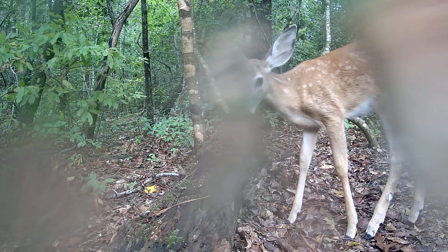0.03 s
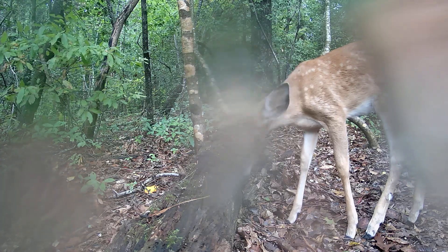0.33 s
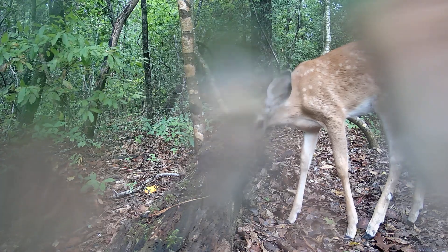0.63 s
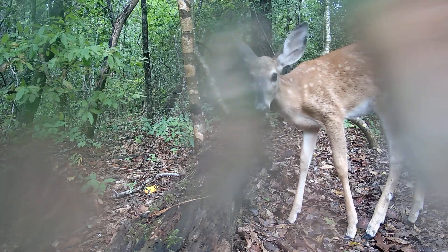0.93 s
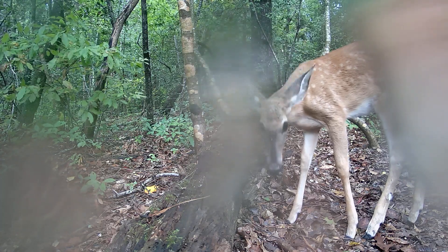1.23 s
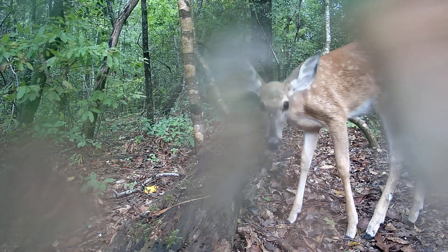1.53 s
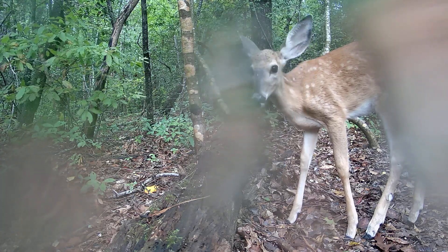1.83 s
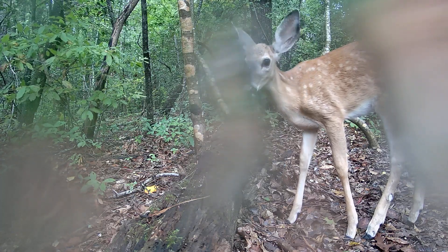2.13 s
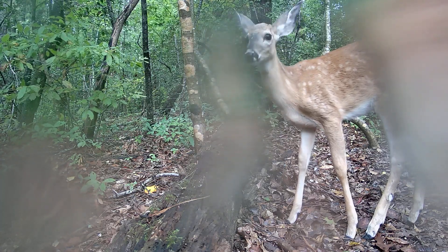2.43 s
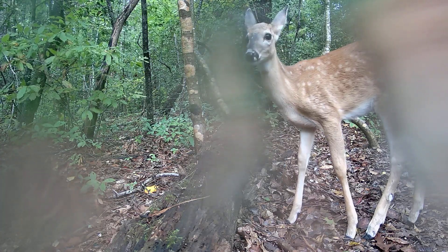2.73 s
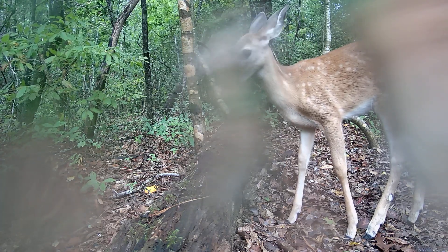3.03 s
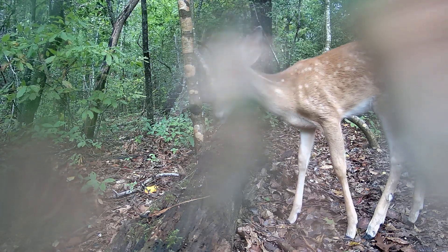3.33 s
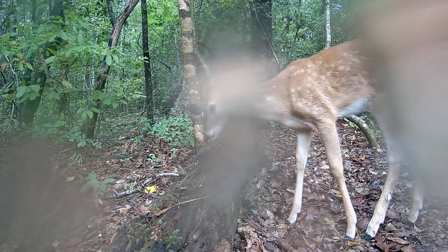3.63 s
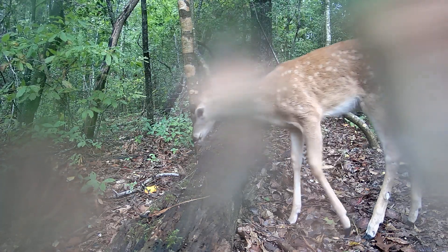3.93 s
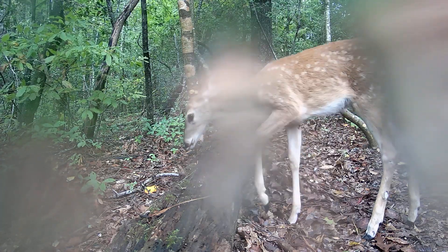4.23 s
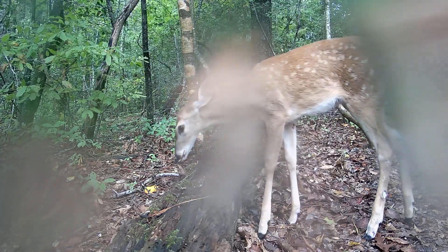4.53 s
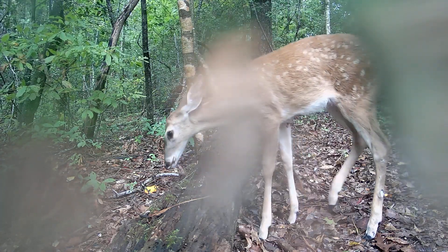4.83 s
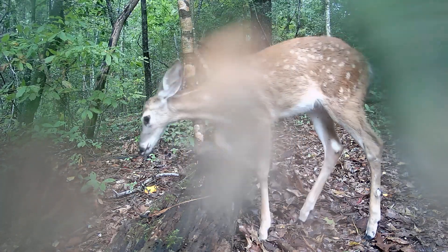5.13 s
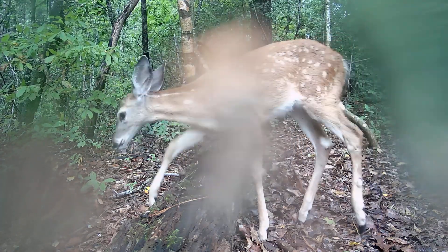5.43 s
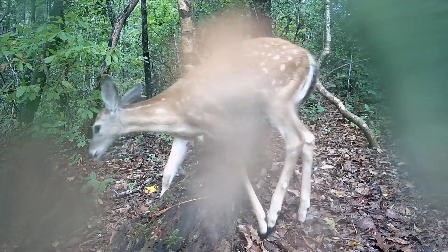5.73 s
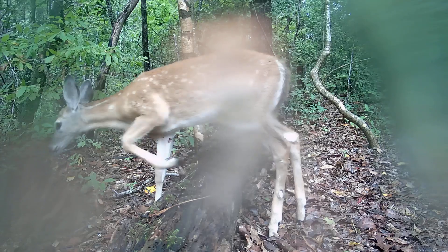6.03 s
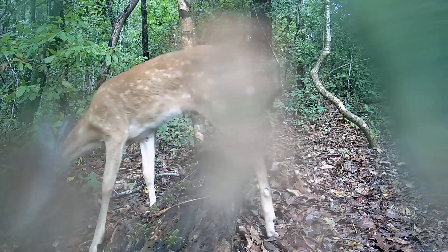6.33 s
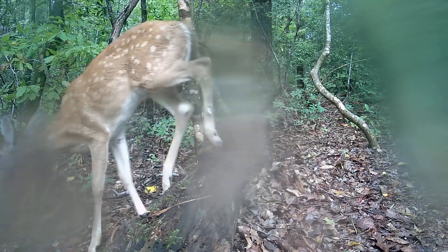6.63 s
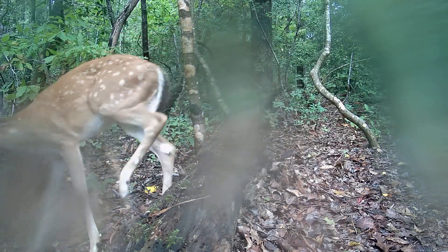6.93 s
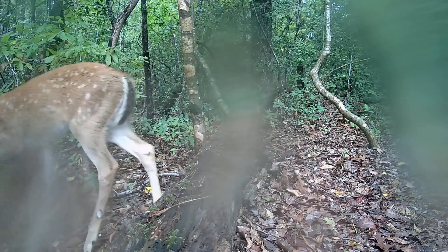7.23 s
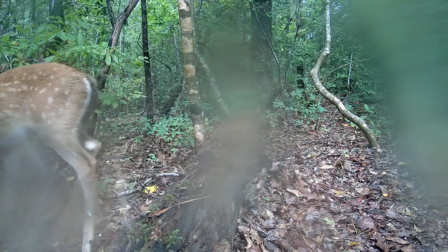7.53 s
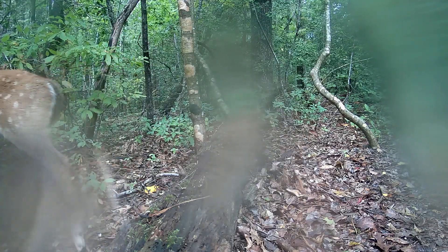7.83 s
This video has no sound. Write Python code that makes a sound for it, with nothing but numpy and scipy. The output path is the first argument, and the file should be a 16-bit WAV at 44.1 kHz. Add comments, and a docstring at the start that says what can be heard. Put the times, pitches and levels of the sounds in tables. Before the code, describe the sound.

Hollow wind noise and low rumble build over faint ticks of a fawn stepping through leaf litter, then two quick, soft knocks.

```python
"""Fawn passing a forest trail camera.

A rush and hiss of air over a low rumble slowly grows, crests and eases above steady microphone hiss,
all coloured by the camera's hollow case. Hooves stir the leaf litter in faint ticks and rustles.
Two dull bumps knock and swing the case as the fawn passes close."""
import sys
import numpy as np
from scipy import signal
from scipy.fft import rfft, irfft, next_fast_len
from scipy.io import wavfile
from scipy.ndimage import uniform_filter1d, map_coordinates

SR = 44100
rng = np.random.default_rng(int(sys.argv[2]) if len(sys.argv) > 2 else 0)


def materialize(psi):
    """Save the field psi as 16-bit PCM at rate SR to the path in sys.argv[1].

    A 1-D psi becomes a single channel; in a 2-D psi each row is a channel.
    """
    bounded = np.clip(np.atleast_2d(psi).T, -1, 1)
    quanta = np.round(bounded * 32767).astype(np.int16)
    wavfile.write(sys.argv[1], SR, quanta)


N = 352359


def amp(db):
    """dB to gain."""
    return 10 ** (np.asarray(db) / 20)


def unit(x):
    """Scale to rms 1."""
    return x / np.sqrt(np.mean(x ** 2) + 1e-20)


def along(points, hz):
    """Interpolate (f/Hz, value) points on a log frequency axis."""
    f, v = np.transpose(points)
    return np.interp(np.log(hz + 1), np.log(f + 1), v)


def wobble(rate_hz):
    """Smooth random curve, rate_hz knots per second."""
    return map_coordinates(rng.standard_normal(400), [np.arange(N) * rate_hz / SR], mode="wrap")


def filtered(x, response):
    """Zero-phase filter with gain response(hz)."""
    m = next_fast_len(len(x) + 8192)
    return irfft(rfft(x, m) * response(np.fft.rfftfreq(m, 1 / SR)), m)[:len(x)]


def band(x, centre_hz, width_oct):
    """Band-pass, Gaussian in log frequency."""
    return filtered(x, lambda hz: np.exp(-.5 * (np.log2((hz + 1) / centre_hz) / width_oct) ** 2))


def case_db(hz):
    """Air resonances in the hollow case lift a few broad bands."""
    # resonances: f/Hz, width/Hz, lift/dB
    modes = [(528, 223, 3.5), (1205, 280, 4), (1810, 480, 1.5)]
    return sum(lift / (1 + (2 * (hz - centre) / width) ** 2) for centre, width, lift in modes)


def case_noise(spectrum, grain_db, frame=1024):
    """Noise through the case, rms 1; random time-frequency patches of gain make it grainy."""
    bins = signal.stft(rng.standard_normal(N), nperseg=frame)[2]
    patches = uniform_filter1d(rng.standard_normal(bins.shape), size=4, axis=0)
    patches = uniform_filter1d(patches, size=3, axis=1)
    grainy = signal.istft(bins * amp(grain_db * unit(patches)), nperseg=frame)[1][:N]
    return unit(filtered(grainy, lambda hz: amp(along(spectrum, hz) + case_db(hz))))


def air_strength_db(t):
    """Air strength relative to its crest: a rounded climb, then a slow easing."""
    crest_s, climb_db, ease_db_per_s = 6.15, 9, 0.5
    to_climb = np.clip(1 - t / crest_s, 0, 1)
    return -climb_db * to_climb ** 2.2 - ease_db_per_s * np.maximum(t - crest_s, 0)


def swells_db(t):
    """Brief swells and dips in the level of the rush and of the rumble."""
    # swells and dips: centre t/s, length/s, rush lift/dB, rumble lift/dB
    swells = [(0.334, 0.22, 3.5, 3.5), (0.765, 0.046, 1.5, 0), (0.834, 0.044, 0, 6),
              (0.869, 0.029, 4.5, -2), (1.26, 0.1, 2.6, -1), (1.54, 0.066, -2, 2.5), (1.605, 0.04, 3.5, 3),
              (2.01, 0.096, 2.5, 0.5), (2.513, 0.094, 3, 0), (2.6, 0.029, -1.5, -4), (2.98, 0.054, 2.7, 2),
              (3.073, 0.04, -1, -1.5), (3.29, 0.038, 3, 4), (3.385, 0.035, 2.3, 0), (3.45, 0.05, -3, -1),
              (3.964, 0.11, -0.5, 3.5), (7.767, 0.13, 0.5, 6)]
    centre_s, length_s, rush_db, rumble_db = np.transpose(swells)
    shapes = np.exp(-2 * ((t - centre_s[:, None]) / length_s[:, None]) ** 2)
    return rush_db @ shapes, rumble_db @ shapes


def air():
    """Moving air: rumble, rush and hiss brighten as they grow; the rush settles from burble to flow."""
    # layer spectra: f/Hz, relative density/dB
    rumble_spectrum = [(10, -16.5), (25, -11.5), (42, -5), (62, 0), (125, -1.5), (170, -5.5), (250, -23),
                       (500, -59)]
    rush_spectrum = [(60, -29), (200, -1.5), (350, -2.5), (800, -1.5), (1100, -2), (1500, -7), (2000, -7),
                     (2400, -21), (4000, -26), (8000, -45.5)]
    hiss_spectrum = [(500, -19.5), (1500, -5.5), (2300, 1), (2900, 2), (3900, 0.5), (5000, -4.5),
                     (6200, -8), (7500, -10), (8000, -19), (8500, -26), (9000, -53.5)]
    crest_db, settle_s, settle_span_s = -27, 3.52, .3
    t = np.arange(N) / SR
    strength_db = air_strength_db(t)
    rush_swell_db, rumble_swell_db = swells_db(t)
    flutter = amp(.5 * wobble(rate_hz=50))
    burble_share = .5 - .5 * np.tanh((t - settle_s) / settle_span_s)
    burble = case_noise(rush_spectrum, grain_db=3.2, frame=768) * flutter
    flow = case_noise(rush_spectrum, grain_db=2.4, frame=768)
    rush = np.sqrt(burble_share) * burble + np.sqrt(1 - burble_share) * flow
    hiss = case_noise(hiss_spectrum, grain_db=2.8, frame=640) * flutter
    lumps = amp(-0.3 * wobble(rate_hz=31))
    rumble = case_noise(rumble_spectrum, grain_db=1.4) * lumps
    # higher layers grow faster with strength
    rumble *= amp(-4.5 + 0.71 * strength_db + rumble_swell_db)
    rush *= amp(0.01 + 1.165 * strength_db + rush_swell_db)
    hiss *= amp(-5 + 1.41 * strength_db)
    return amp(crest_db) * (rumble + rush + hiss)


def microphone_hiss():
    """The microphone's own even noise."""
    # noise floor: f/Hz, relative density/dB
    spectrum = [(200, 4), (1900, -1.5), (2400, -7), (5000, -3), (7500, -5), (8000, -14), (8500, -18.5),
                (9000, -48.5)]
    return amp(-43) * case_noise(spectrum, grain_db=1.5)


def leaf_litter():
    """Dry leaves tick and crackle under the hooves, fading above about 8 kHz, the microphone's limit."""
    # ticks and rustles: centre t/s, length/s, level/dB, f/Hz, width/oct
    rustles = [(0.792, 0.021, -37, 2550, 0.28), (0.965, 0.03, -50, 5800, .3),
               (1.489, 0.0093, -33, 2580, .2), (1.812, 0.022, -38, 3900, .15),
               (2.002, 0.066, -39.5, 5070, .4), (2.019, 0.01, -33, 2250, .2), (2.538, 0.2, -40, 4370, 0.49),
               (3.901, 0.31, -41.5, 5570, .4), (4.295, 0.01, -32, 4400, .25),
               (4.506, 0.059, -32.5, 3300, .13), (4.882, 0.35, -39, 5370, 0.43),
               (5.1, 0.17, -36, 3700, 0.49), (5.118, 0.012, -37, 5800, .3), (5.888, 0.18, -36, 2700, 0.35),
               (5.985, 0.032, -36, 5500, .4), (6.038, 0.012, -30, 4080, .25), (6.955, 0.026, -35, 5700, .3),
               (7.039, 0.018, -34, 5400, .25), (7.089, 0.013, -34, 6400, 0.23),
               (7.085, 0.031, -31, 2690, .35), (7.414, 0.012, -36, 4000, .25),
               (7.93, 0.067, -34.5, 4000, 0.43)]
    crackles_per_s = 2900
    out = np.zeros(N)
    t = np.arange(SR // 2) / SR - 1 / 4
    for centre_s, length_s, db, hz, width_oct in rustles:
        grains = rng.standard_normal(len(t)) * (rng.random(len(t)) < crackles_per_s / SR)
        crackle = unit(band(grains, hz, width_oct))
        swell = np.exp(-2 * (t / length_s) ** 2)
        add(out, centre_s + t[0], amp(db) * crackle * swell)
    mic_rolloff = [(7300, -2.5), (8000, -4.5), (9000, -28)]  # f/Hz, gain/dB
    return filtered(out, lambda hz: amp(along(mic_rolloff, hz)))


def add(track, start_s, sound):
    """Mix sound into track at start_s."""
    part = track[round(start_s * SR):][:len(sound)]
    part += sound[:len(part)]


def pulse(t, hz, rise_s):
    """Heavily damped vibration; the envelope peaks at rise_s."""
    return np.sin(2 * np.pi * hz * t) * (t / rise_s * np.exp(1 - t / rise_s)) ** 2


def bumps():
    """Each soft blow knocks the case, swings it a cycle or two and leaves a short low thud."""
    # blows: t/s, level/dB, swing f/Hz, rise/s, knock re swing/dB, thud level/dB
    blows = [(6.489, -9.5, 177, 0.0022, -8, -19), (6.6493, -11, 250, 0.0029, -6, -39)]
    thud_rise_s, thud_t60_s, contact_cutoff_hz = 0.0028, 0.22, 660
    out = np.zeros(N)
    t = np.arange(SR // 4) / SR
    thud_envelope = (1 - np.exp(-t / thud_rise_s)) * amp(-60 * t / thud_t60_s)
    for start_s, db, swing_hz, rise_s, knock_db, thud_db in blows:
        swing = pulse(t, swing_hz, rise_s)
        knock = pulse(t, hz=457, rise_s=.8 * rise_s)
        thud = unit(band(rng.standard_normal(len(t)), centre_hz=150, width_oct=0.63)) * thud_envelope
        add(out, start_s, amp(db) * (swing - amp(knock_db) * knock) + amp(thud_db) * thud)
    return filtered(out, lambda hz: 1 / np.sqrt(1 + (hz / contact_cutoff_hz) ** 10))


def scene():
    """Mono mix at the microphone."""
    return (air() + bumps() + leaf_litter() + microphone_hiss())[None]


def record(dry):
    """The camera: silent until its microphone switches on, then band-limited."""
    on_s, top_hz, taper_hz = .212, 8995, 200
    live = np.arange(N) / SR >= on_s
    return filtered(dry[0] * live, lambda hz: np.clip((top_hz - hz) / taper_hz, 0, 1))[None]


dry = scene()
out = record(dry)
materialize(out)
```